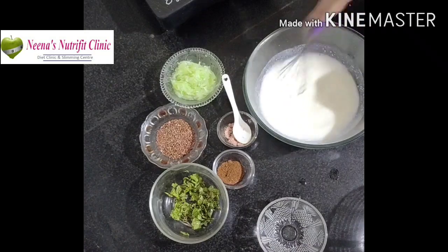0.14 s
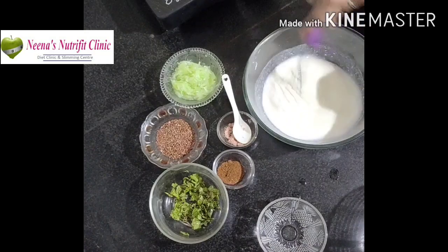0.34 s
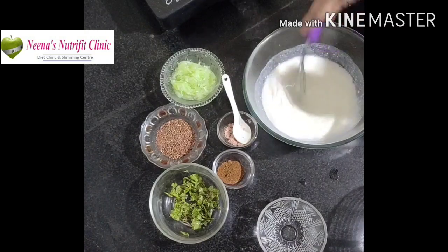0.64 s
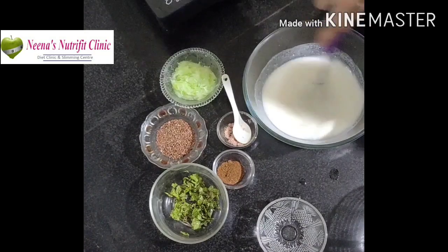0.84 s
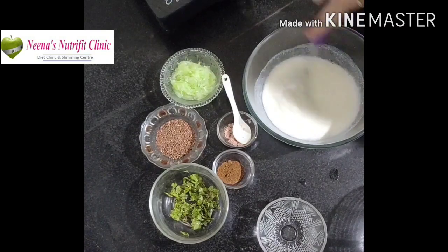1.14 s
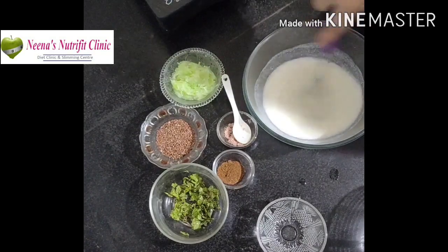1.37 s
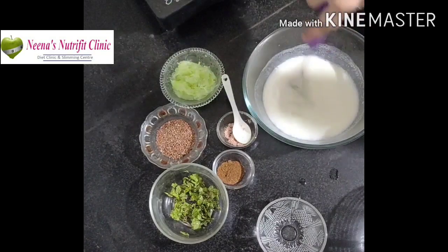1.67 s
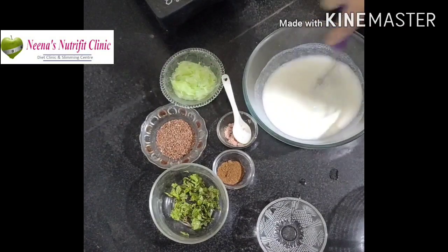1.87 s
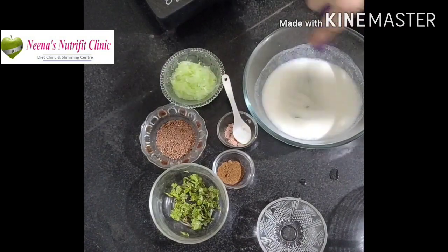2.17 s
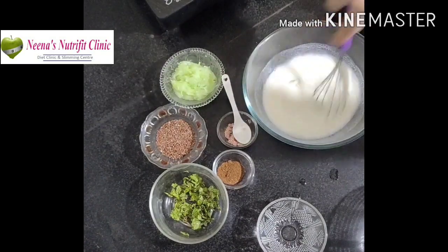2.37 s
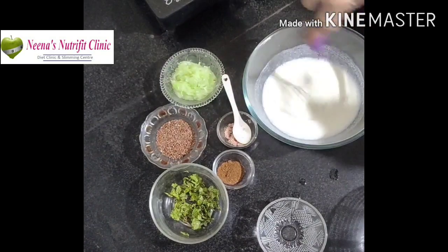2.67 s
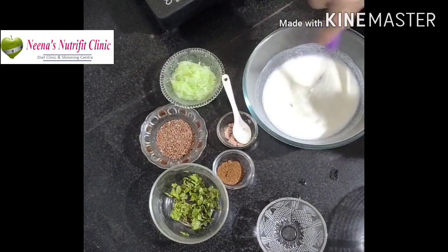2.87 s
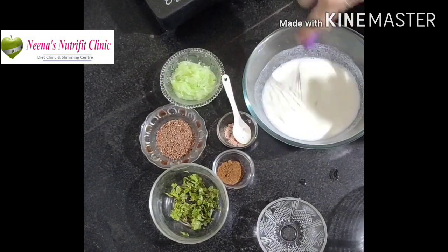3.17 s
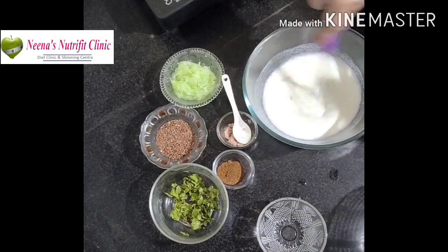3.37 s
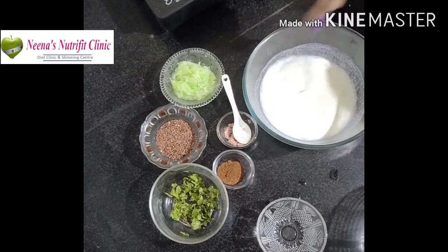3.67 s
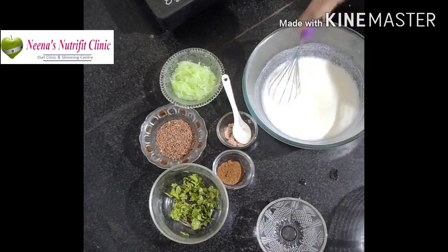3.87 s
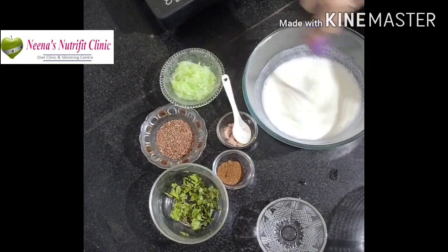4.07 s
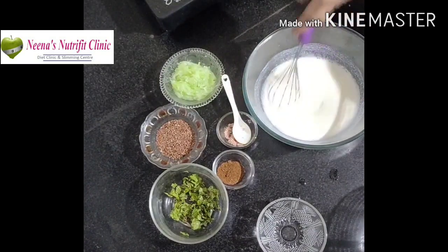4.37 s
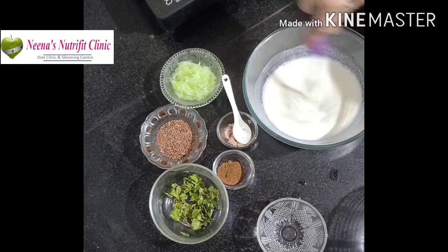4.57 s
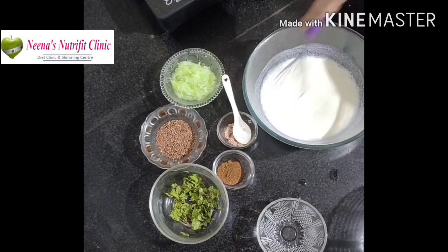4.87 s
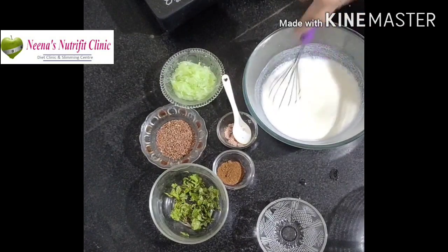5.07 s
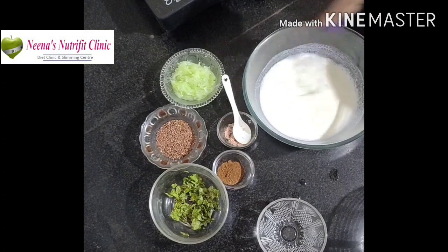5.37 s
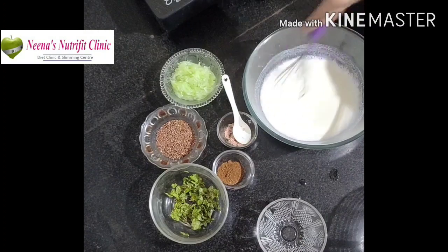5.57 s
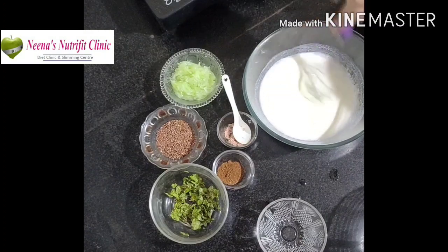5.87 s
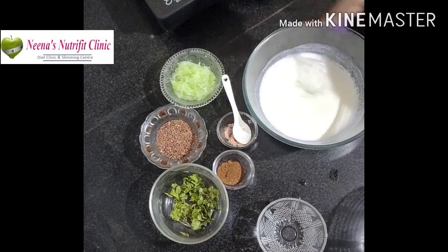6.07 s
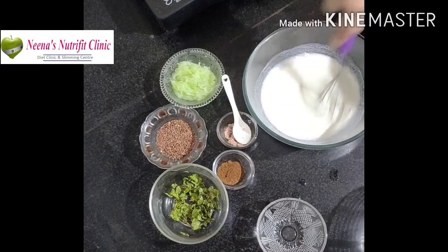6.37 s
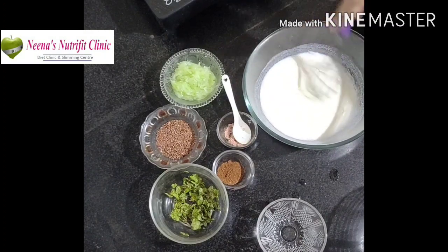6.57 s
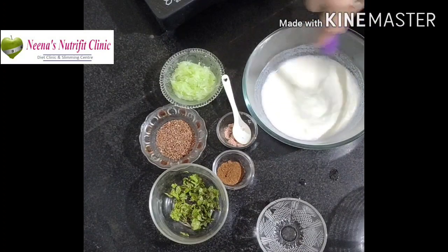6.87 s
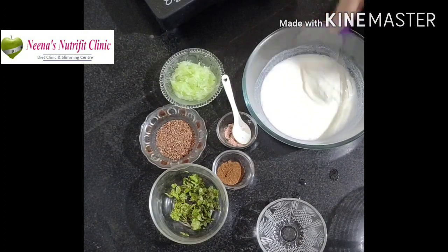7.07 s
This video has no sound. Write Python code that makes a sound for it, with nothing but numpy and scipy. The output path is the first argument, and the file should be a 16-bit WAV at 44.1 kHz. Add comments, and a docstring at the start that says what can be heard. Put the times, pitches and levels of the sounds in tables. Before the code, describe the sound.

Quick irregular metallic whisk rattles ring against glass in a small kitchen, with dull counter thumps and a few wet pops over low hiss.

```python
"""Whisking batter in a glass bowl

A wire whisk beats thin batter in a glass bowl on a stone counter, in a small kitchen with echoes.
Touches are swarms of random ticks through short resonators; glass, wires and counter ring as struck modes.
Air pockets pop as gliding sines; a two-note horn in the street is a sum of harmonics.
Hum and hiss are banded noise with hollow resonances. One microphone feeds both channels."""
import sys
import numpy as np
from scipy import signal
from scipy.fft import rfft, irfft, next_fast_len
from scipy.io import wavfile

SR = 44100
rng = np.random.default_rng(int(sys.argv[2]) if len(sys.argv) > 2 else 0)


def store_wav(level_fs):
    """Save 16-bit WAV to argv[1]."""
    pcm = np.round(np.clip(np.atleast_2d(level_fs), -1, 1) * 32767)
    wavfile.write(sys.argv[1], SR, pcm.T.astype(np.int16))


N = 318710


def from_db(db):
    """Decibels to amplitude gain."""
    return 10 ** (np.asarray(db) / 20)


def rms_one(x):
    """Scales to unit rms."""
    return x / np.sqrt(np.mean(x ** 2) + 1e-20)


def at_hz(points, hz):
    """Interpolates a dB spectrum on a log-frequency axis."""
    f_hz, level_db = np.transpose(points)
    return np.interp(np.log(hz), np.log(f_hz), level_db)


def drift(rate_hz):
    """Slow random wander of rms 1: two-pole smoothed noise on a grid of 40 samples."""
    step = 40
    r = np.exp(-2 * np.pi * rate_hz * step / SR)
    noise = rng.standard_normal(N // step + 2002)
    slow = signal.lfilter([1], [1, -2 * r, r * r], noise)[2000:]  # settled part
    return np.interp(np.arange(N) / step, np.arange(len(slow)), rms_one(slow))


def ring(clicks, hz, t60_s):
    """Two-pole resonator: a unit click starts a decaying sine of initial height 1."""
    r = from_db(-60 / (t60_s * SR))
    w = 2 * np.pi * hz / SR
    return signal.lfilter([0, np.sin(w)], [1, -2 * r * np.cos(w), r * r], clicks + 1e-18)


def band(x, low_hz, high_hz):
    """Butterworth band-pass."""
    return signal.sosfilt(signal.butter(2, [low_hz, high_hz], "band", fs=SR, output="sos"), x)


def ticks(per_s, rows):
    """Random ticks of uneven size and sign; rms 1 over all rows."""
    size_db = 1.75 * np.minimum(rng.exponential(1, (rows, N)), 5)
    sizes = from_db(size_db) * rng.choice([-1, 1], (rows, N))
    return rms_one(sizes * (rng.random((rows, N)) < per_s / SR))


def struck(times_s, levels_db, modes, contact_s, spread_db=2):
    """A blow is four contacts, the later ones nominally weaker; each excites each mode by chance."""
    out = np.zeros(N)
    late = rng.random((len(times_s), 4)) * [0, 1, 1, 1]  # share of contact_s
    at = np.minimum((np.asarray(times_s)[:, None] + contact_s * late) * SR, N - 1).astype(int)
    contact_db = levels_db[:, None] - 9 * (late > 0) - 6 * late
    luck = rng.standard_normal((len(times_s), 4, len(modes)))
    for k, (hz, mode_db, t60_s) in enumerate(modes):
        clicks = np.zeros(N)
        np.add.at(clicks, at, from_db(contact_db + mode_db + spread_db * luck[:, :, k]))
        # subtracting a copy with t60 = contact_s rounds the onset
        out += ring(clicks, hz, t60_s) - ring(clicks, hz, contact_s)
    return out


# hum and hiss spectrum, relative: f/Hz, level/dB per Hz
HISS_SPECTRUM = [(35, -71), (60, -12), (110, 5), (172, 8.5), (411, -12.5), (531, -3.5), (704, -24.5),
                 (890, -9.5), (1330, -19.5), (1680, -13.5), (2810, -24), (6540, -20), (8270, -77),
                 (14900, -33), (16300, -56)]
# resonances in the hiss: f/Hz, width/Hz, level/dB re banded noise
HOLLOWS = [(565, 97, -8.5), (696.6, 65, -8.5), (1646, 67, -21)]
HISS_DB = -44.5  # rms of the banded noise


def hiss():
    """Noise bands wavering together and apart, plus hollow resonances."""
    out, together = np.zeros(N), drift(2.5)
    edges_hz = np.geomspace(25, 16400, 24)
    white = rng.standard_normal((3, N))
    for k, (low_hz, high_hz) in enumerate(zip(edges_hz, edges_hz[1:])):
        level_db = at_hz(HISS_SPECTRUM, np.sqrt(low_hz * high_hz))
        waver_db = 1.4 * together + 1.6 * drift(10)
        out += from_db(level_db + waver_db) * band(white[k % 2], low_hz, high_hz)
    hollow = np.zeros(N)
    for hz, width_hz, level_db in HOLLOWS:
        resonance = band(white[2], hz - width_hz / 2, hz + width_hz / 2)
        hollow += from_db(level_db) * rms_one(resonance)
    return from_db(HISS_DB) * (rms_one(out) + hollow)


# wires meet the glass: t/s, rattle level/dB, rattle t60/s (before clipping),
# wall ring level/dB, wire ring level/dB
TOUCHES = [(0.0568, -46, 0.36, -63, -60), (0.18, -32.5, .12, -52, -46), (0.197, -23, 0.12, -41, -21),
           (0.2089, -22.5, 0.46, -34, -24), (0.2558, -17.5, 0.33, -35, -15.5),
           (0.4653, -27, 0.024, -44, -37.5), (0.5167, -39.5, 0.44, -55, -43),
           (0.5487, -44, 0.45, -62, -23.5), (0.5861, -17.5, .13, -19, -36), (0.6809, -29.5, 0.16, -53, -31),
           (0.6933, -23, .08, -55, -48), (0.7492, -36, 0.19, -43, -37), (0.8056, -48, 0.093, -61, -47),
           (0.9403, -19.5, 0.062, -26, -24), (0.9617, -23.5, 0.11, -50, -31),
           (0.9941, -22.5, 0.055, -55, -45), (1.045, -50, 0.41, -65, -36), (1.0974, -25, .06, -61, -42),
           (1.1797, -37.5, 0.13, -51, -60), (1.3209, -49, .36, -62, -37.5), (1.3588, -25, 0.075, -53, -39),
           (1.5309, -38, 0.049, -68, -58), (1.6202, -16.5, 0.057, -56, -30.5),
           (1.7878, -24, 0.11, -52, -35), (1.8861, -21.5, 0.052, -59, -36),
           (2.0233, -38.5, 0.061, -56, -48), (2.0662, -20.5, 0.16, -51, -22),
           (2.1495, -14, 0.099, -23, -28), (2.3106, -13, 0.22, -32, -36), (2.4134, -20.5, 0.053, -30, -41),
           (2.6663, -23, 0.1, -25, -28.5), (2.9088, -26, .12, -58, -32.5), (3.1330, -21, .17, -15, -32),
           (3.3739, -24.5, 0.11, -32, -28.5), (3.5942, -32.5, 0.045, -39, -39),
           (3.6287, -19.5, 0.092, -33, -33), (3.721, -25.5, 0.26, -38, -38),
           (3.7813, -11.5, 0.15, -44, -20), (3.8661, -17.5, 0.062, -41, -41),
           (3.9654, -25.5, 0.08, -39, -39), (4.0923, -18, 0.16, -15, -42), (4.214, -56, 0.033, -63, -50),
           (4.335, -28, 0.074, -57, -36), (4.4278, -28.5, 0.13, -29, -47), (4.5575, -24, 0.073, -42, -34),
           (4.57, -18.5, .14, -10.5, -37), (4.793, -38, 0.037, -72, -45), (4.9192, -55, 0.042, -70, -55),
           (4.9636, -42.5, 0.087, -50, -38), (4.9921, -32.5, 0.094, -35, -43),
           (5.0045, -35.5, 0.071, -56, -27.5), (5.1337, -35.5, .21, -42, -34.5),
           (5.2614, -21, 0.19, -15, -43), (5.3453, -37.5, 0.076, -46, -62), (5.4829, -36, .36, -34, -52),
           (5.4994, -13.5, 0.054, -36, -46), (5.587, -32.5, 0.45, -44, -44), (5.5991, -14, 0.21, -37, -40),
           (5.7064, -16.5, 0.047, -53, -46), (5.8127, -29, 0.022, -51, -42), (5.8411, -40.5, 0.1, -63, -83),
           (5.9384, -33.5, .13, -60, -29), (6.0751, -34, 0.073, -53, -58), (6.137, -46, 0.37, -58, -42),
           (6.1739, -38.5, 0.087, -46, -40), (6.3719, -28, 0.29, -32, -32),
           (6.4038, -17.5, 0.065, -42, -36), (6.4153, -16.5, 0.099, -15.5, -35),
           (6.6388, -33.5, 0.22, -52, -30), (6.6628, -27, 0.064, -18, -27), (6.8723, -33, 0.64, -32, -23),
           (6.9052, -18.5, .15, -10.5, -38), (7.1616, -25.5, 0.13, -44, -48),
           (7.1736, -38, 0.16, -11.5, -34)]
# whisk rattle spectrum, relative: f/Hz, level/dB per Hz
RATTLE_SPECTRUM = [(350, -122), (550, -14), (1050, -7.5), (1400, -13), (2000, -20), (2450, -50),
                   (3400, -3.5), (4200, 9), (4800, 8), (5300, 10.5), (6600, 18), (7400, 11.5), (8100, -20),
                   (9300, -8.5), (10700, -10), (12500, -18.5), (16300, -18.5)]
# wires dragging through the batter: t/s, level/dB before wander
STIR = [(0.0, -45.5), (0.5, -148), (1.39, -61), (2.37, -64), (2.94, -81), (3.62, -70), (3.8, -49),
        (4.13, -67.5), (7.23, -78)]
LANDING_S = .0055  # rise time of a touch's swarm
TILT_AT_0_DB, TILT_PER_DB = -1, 0.1376  # dB/octave; dB/octave per dB: harder touches are brighter
# faint contacts at random times
GRAZES, GRAZE_DB, GRAZE_SPREAD_DB, GRAZE_T60_S = 10, -48, 3.0, .15


def rattle():
    """Touches and drag are tick swarms exciting 64 short whisk modes, each by its own share."""
    pitches_hz = np.geomspace(400, 16000, 64) * from_db(.08 * rng.standard_normal(64))
    t = np.arange(int(.3 * SR)) / SR
    tick = ticks(per_s=5000, rows=3) * from_db(3.2 * drift(80))  # in clumps
    graze = rng.random((GRAZES, 2))

    stir_s, stir_db = np.transpose(STIR)
    drag_db = np.interp(np.arange(N) / SR, stir_s, stir_db) + 9.6 * drift(16.0)
    drag = np.append(from_db(drag_db), np.zeros(len(t)))  # room for the last tail

    at_s, level_db, t60_s = np.transpose(TOUCHES)[:3]
    at_s = np.append(at_s, LANDING_S + graze[:, 0] * (N / SR - LANDING_S))
    level_db = np.append(level_db, GRAZE_DB + GRAZE_SPREAD_DB * (2 * graze[:, 1] - 1))
    t60_s = np.clip(np.append(t60_s, np.full(GRAZES, GRAZE_T60_S)), .02, .4)[:, None]
    tilt_db = TILT_AT_0_DB + TILT_PER_DB * level_db
    luck = rng.standard_normal((len(at_s), len(pitches_hz)))

    shapes = from_db(-60 * t / t60_s)
    shapes *= 1 - np.exp(-(t / LANDING_S) ** 2)
    shapes *= 1 + 2.5 * np.exp(-t / .005)  # the first wires land hardest
    starts = ((at_s - LANDING_S) * SR).astype(int)

    out, power = np.zeros(N), 0
    for k, hz in enumerate(pitches_hz):
        swarm = drag.copy()
        shares = from_db(level_db + tilt_db * np.log2(hz / 5500) + 1.24 * luck[:, k])
        for i, share, shape in zip(starts, shares, shapes):
            swarm[i:i + len(t)] += share * shape[:len(swarm) - i]
        ring_s = min(120 / hz, .07)  # t60 of 120 cycles, fewer in the bass
        gain = from_db(at_hz(RATTLE_SPECTRUM, hz)) * np.sqrt(hz / ring_s)
        out += gain * ring(swarm[:N] * tick[k % 3], hz, ring_s)
        power += gain ** 2 * ring_s * SR / (4 * np.log(1000))  # energy of a decaying sine
    return band(out, 350, 17000) / np.sqrt(power)


# rim struck above the batter: t/s, low ring level/dB, high ring level/dB
RIM_HITS = [(0.1994, -53.5, -31), (0.5826, -53.5, -36), (0.7026, -54, -56), (0.9394, -59, -46),
            (3.7225, -44, -17.5), (3.7753, -37.5, -51), (5.5937, -40, -19), (5.6344, -31, -24.5)]
# bowl knocks on the counter: t/s, bowl level/dB, counter thump level/dB
KNOCKS = [(0.254, -20, -24), (0.586, -47, -68), (0.748, -38, -58), (0.938, -56, -42), (1.62, -57, -57),
          (1.789, -38.5, -34.5), (2.071, -32.5, -27), (2.147, -34, -59), (2.318, -24, -22.5),
          (2.418, -46, -63), (2.667, -53, -66), (3.136, -34, -36.5), (3.37, -62, -43), (3.779, -27, -17.5),
          (4.087, -51, -38), (4.333, -41, -62), (4.566, -34, -63), (5.256, -50, -55), (5.6, -52, -36.5),
          (6.406, -39, -42), (6.9, -37, -37), (7.171, -41.5, -40)]
# modes of glass wall, whisk wires, bowl base, stone counter, rim low and high: f/Hz, level/dB, t60/s
WALL_MODES = [(2780, -15, .09), (3600, -15, .07), (4180, -9, .08), (4260, -5, .09), (4365, -2, .09),
              (4460, -8, .07), (4570, -12, .06), (6400, -5, .05), (6480, -5, .06), (6590, -2, .07),
              (8750, -22, .05), (10800, -20, .05)]
WIRE_MODES = [(1750, -20, .08), (3500, -11, .09), (5250, 0, .09), (5390, -6, .08), (5850, -12, .07),
              (7050, -11, .06)]
BASE_MODES = [(492, -4, .11), (820, -9, .07), (1000, 0, .1), (1130, -5, .08), (1970, -3, .09),
              (2150, -7, .07), (2600, -10, .08), (3290, -2, .1), (3700, -9, .08)]
COUNTER_MODES = [(102, 0.5, 0.16), (161.6, -3.5, 0.13), (280, -15, 0.036)]
RIM_LOW_MODES = [(530, -5, .3), (1452, 0, .6), (2622, -2, .35)]
RIM_HIGH_MODES = [(4090, 0, .12), (4590, -6, .12), (5825, -2, .13), (7850, -2, .1)]


def glass_and_wires():
    """Struck modes of glass, wires and counter ring after touches, rim hits and knocks."""
    touch, rim, knock = np.transpose(TOUCHES), np.transpose(RIM_HITS), np.transpose(KNOCKS)
    wall = struck(touch[0], touch[3], WALL_MODES, contact_s=0.026, spread_db=4.0)
    wires = struck(touch[0], touch[4], WIRE_MODES, contact_s=0.025, spread_db=3.0)
    rim_low = struck(rim[0], rim[1], RIM_LOW_MODES, contact_s=0.0022)
    rim_high = struck(rim[0], rim[2], RIM_HIGH_MODES, contact_s=0.0092)
    base = struck(knock[0], knock[1], BASE_MODES, contact_s=.008, spread_db=3)
    counter = struck(knock[0], knock[2], COUNTER_MODES, contact_s=.012, spread_db=1.5)
    # the high rings of glass and wires flutter irregularly in loudness
    glass_flutter, wire_flutter = from_db(4 * drift(55)), from_db(4 * drift(55))
    high_glass = glass_flutter * (wall + rim_high)
    return high_glass + wire_flutter * wires + rim_low + base + counter


# air pockets pop in the batter: t/s, level/dB, settled f/Hz, t60/s, initial pitch offset/share of f
POPS = [(1.690, -11, 2820, 0.016, -0.038), (5.601, -25.5, 1574, 0.27, 0.1), (6.179, -15, 805, 0.083, 0.2),
        (6.219, -25.5, 830, 0.12, 0.055)]


def pops():
    """An air pocket rings briefly while its pitch settles."""
    out, t = np.zeros(N), np.arange(int(.3 * SR)) / SR
    for at_s, level_db, hz, t60_s, offset in POPS:
        pitch_hz = hz * (1 + offset * np.exp(-t / .005))
        shape = (1 - np.exp(-t / .0015)) * from_db(level_db - 60 * t / t60_s)
        i = int(at_s * SR)
        out[i:i + len(t)] += shape * np.sin(2 * np.pi * np.cumsum(pitch_hz) / SR)
    return out


# two horn notes: f/Hz, level/dB, slope/dB per harmonic number
HORN_PITCHES = [(417, 0, 0), (318, -1, -1.2)]
# horn spectrum: f/Hz, level/dB
HORN_COLOUR = [(300, 2), (430, -0.5), (840, -6.5), (1250, -26), (1700, -15), (2500, -15), (2920, 0),
               (3340, -1.5), (3760, -3), (4200, -22)]
HORN_AT_S, HORN_END_S, HORN_EDGE_S = 2.37, 2.65, 0.015
HORN_START_DB, HORN_FADE_DB_PER_S, HORN_WAVER_DB = -44, 53, 2.5


def horn():
    """Two fading harmonic notes; each harmonic wavers on its way through the street and the window."""
    t = np.arange(N) / SR
    rise = np.clip((t - HORN_AT_S) / HORN_EDGE_S, 0, 1)
    fall = np.clip((HORN_END_S - t) / HORN_EDGE_S, 0, 1)
    tones = np.zeros(N)
    for hz, note_db, slope_db in HORN_PITCHES:
        for k in range(1, int(4200 / hz)):
            level_db = note_db + slope_db * k + at_hz(HORN_COLOUR, k * hz)
            gain = from_db(level_db + HORN_WAVER_DB * drift(14))
            tones += gain * np.sin(2 * np.pi * (k * hz * t + rng.random()))
    fade_db = HORN_START_DB - HORN_FADE_DB_PER_S * np.maximum(t - HORN_AT_S, 0)
    return from_db(fade_db) * rise * fall * tones


KITCHEN_T60_S, KITCHEN_DB, ECHO_LOWPASS_HZ = 0.36, -17, 2680  # t60 in the bass; treble dies faster


def kitchen(x):
    """Ten parallel feedback delays, duller on every round."""
    size = next_fast_len(N + SR)
    w = 2 * np.pi * np.arange(size // 2 + 1) / size
    dull = 1 / (1 + 1j * w * SR / (2 * np.pi * ECHO_LOWPASS_HZ))
    echoes = 0
    for k, lag_s in enumerate(np.geomspace(.011, .037, 10)):
        delay = np.exp(-1j * w * round(lag_s * SR))
        loop = dull * from_db(-60 * lag_s / KITCHEN_T60_S) * delay
        echoes = echoes + (-1) ** k * loop / (1 - loop)
    return irfft(rfft(x, size) * echoes, size)[:N]


def scene():
    """Bowl with kitchen echoes, horn and hiss, the same in both channels."""
    bowl = rattle() + glass_and_wires() + pops()
    mono = bowl + from_db(KITCHEN_DB) * kitchen(bowl) + horn() + hiss()
    return np.array([mono, mono])


MICROPHONE_LOW_HZ, STOPBAND_HZ = 69.4, 16700


def record(dry):
    """The microphone drops the deepest bass, the highest peaks are rounded, the top is cut."""
    highpass = signal.butter(2, MICROPHONE_LOW_HZ, "high", fs=SR, output="sos")
    thin = signal.sosfilt(highpass, dry)
    rounded = thin / (1 + np.abs(thin / .88) ** 6) ** (1 / 6)
    lowpass = signal.cheby2(14, 90, STOPBAND_HZ, fs=SR, output="sos")  # 90 dB down
    return signal.sosfilt(lowpass, rounded)


dry = scene()
out = record(dry)
store_wav(out)
```